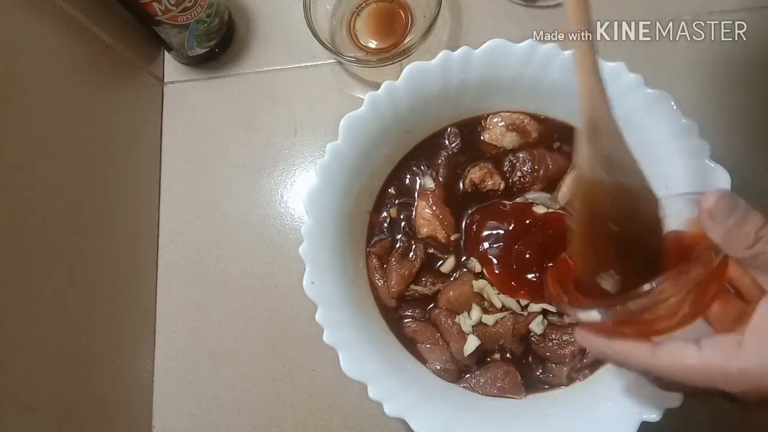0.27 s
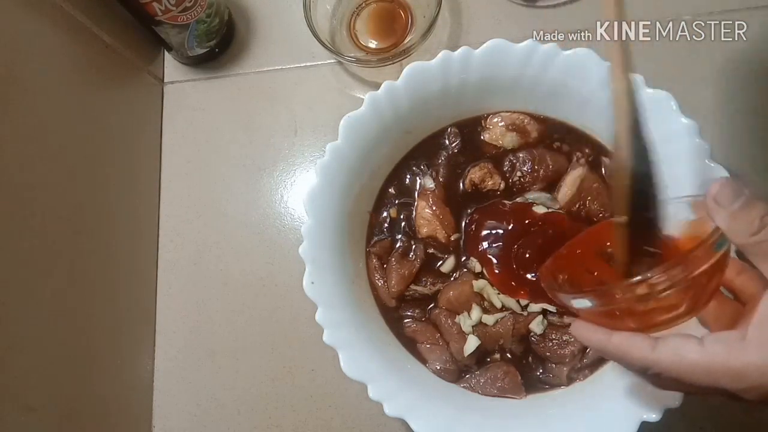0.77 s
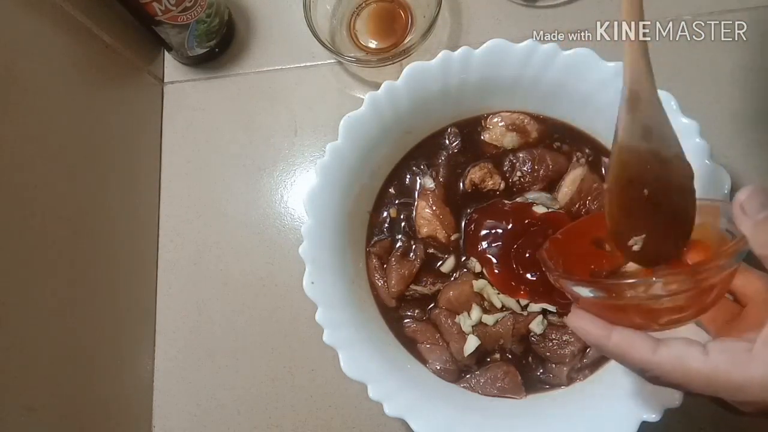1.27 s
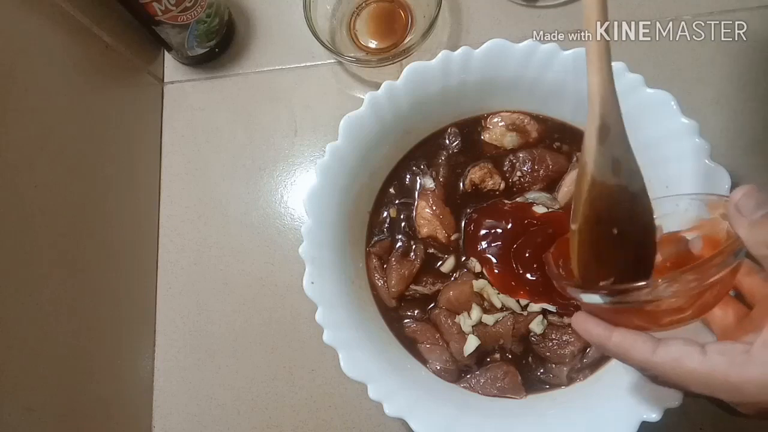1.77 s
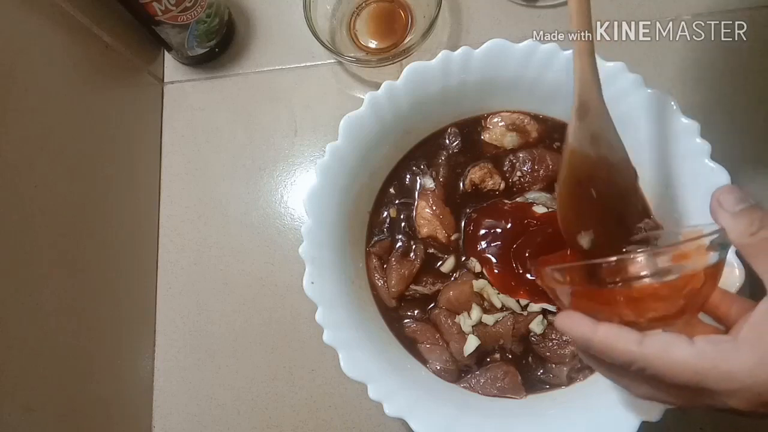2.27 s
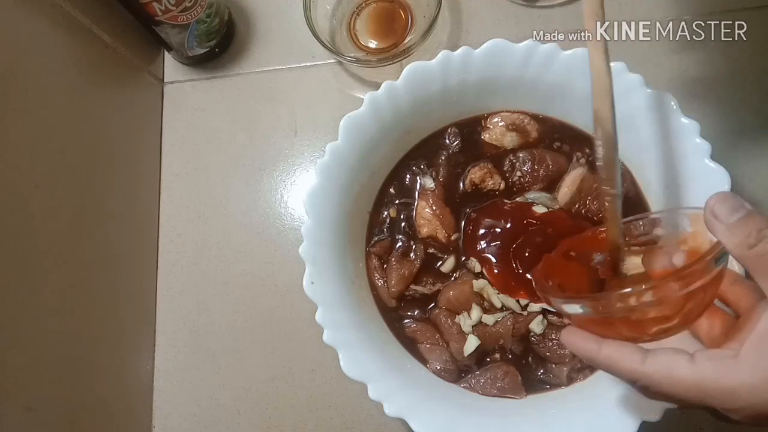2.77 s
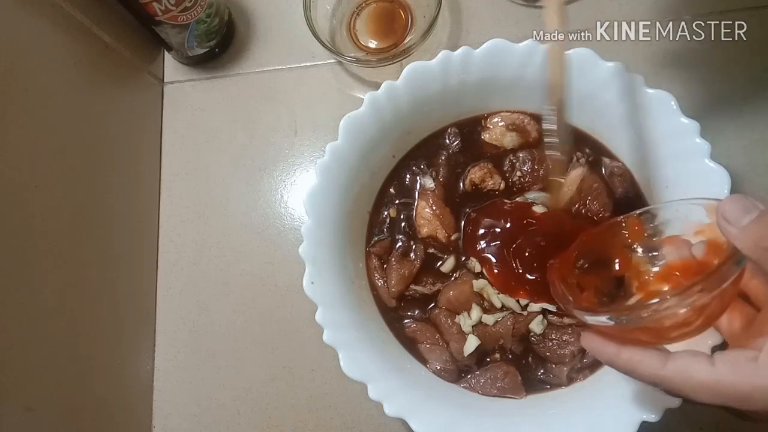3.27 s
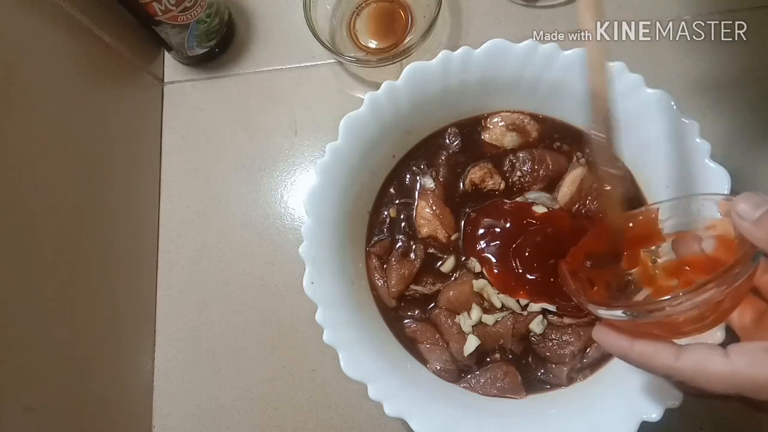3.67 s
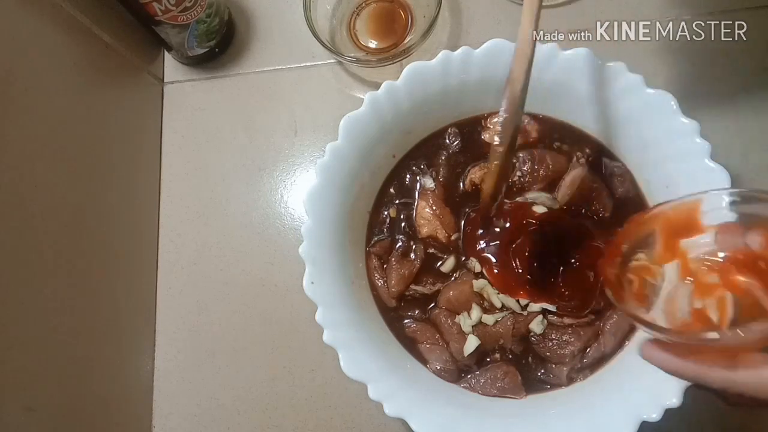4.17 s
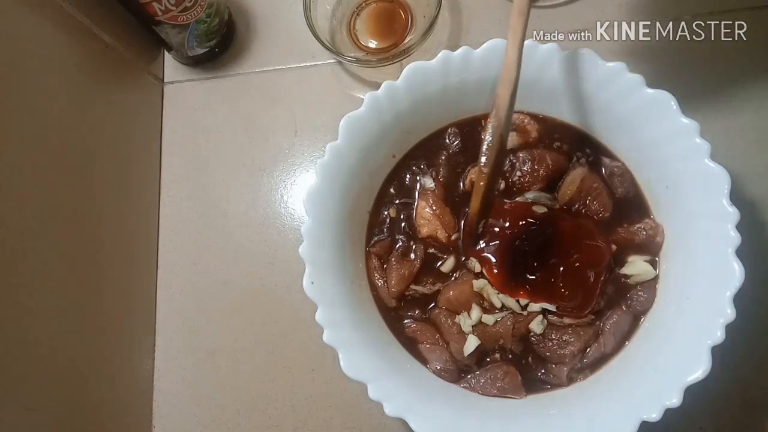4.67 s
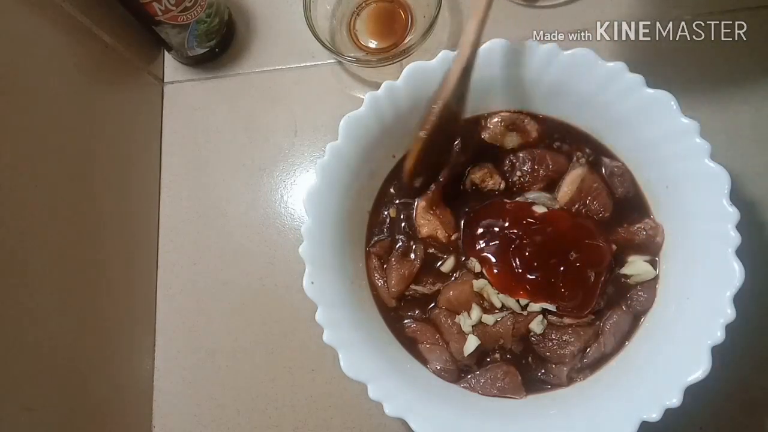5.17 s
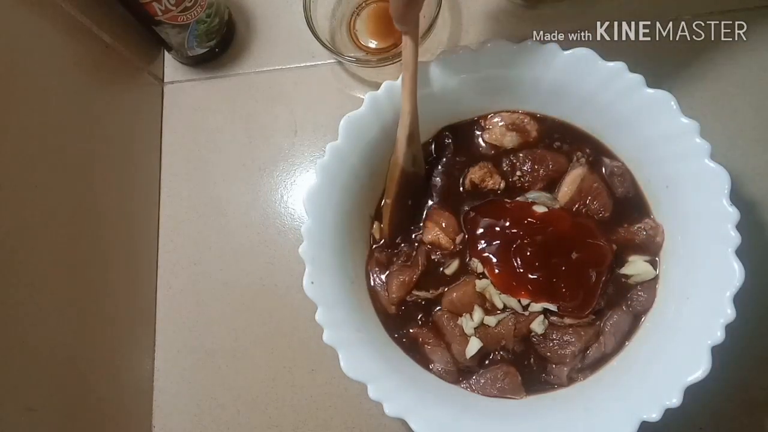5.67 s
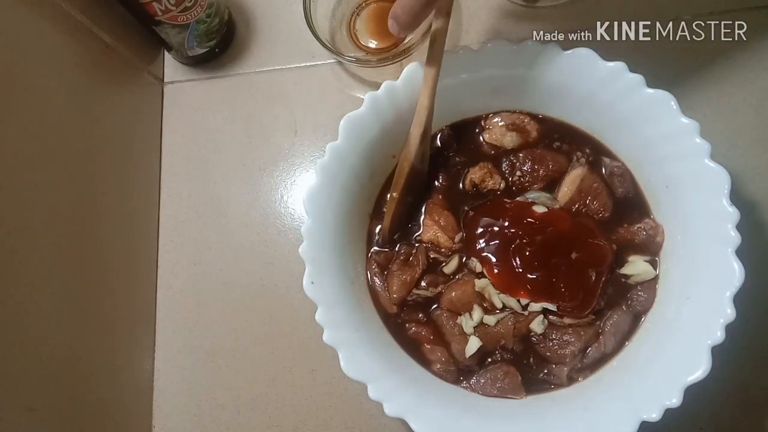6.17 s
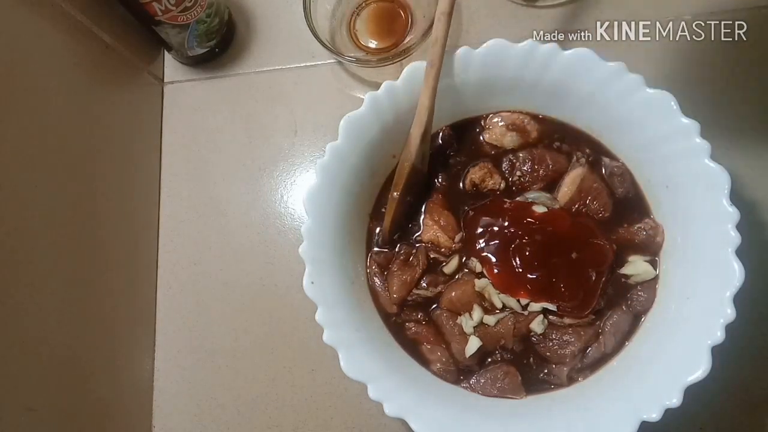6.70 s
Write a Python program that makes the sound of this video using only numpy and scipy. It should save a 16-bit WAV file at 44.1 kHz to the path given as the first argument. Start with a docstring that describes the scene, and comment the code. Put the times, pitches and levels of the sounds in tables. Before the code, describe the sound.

In a hard-walled kitchen, a wooden spoon taps a small sauce-coated glass bowl in uneven, dry knocks with short damped pings. After a pause the bowl is set down, bouncing quickly to rest with chopped bright rings. Stacked glass clinks sharply, then something drags softly. A low motor hum and steady hiss continue throughout. One close microphone, almost mono, short reflections.

```python
"""A wooden spoon taps a small hand-held glass bowl in a hard-walled kitchen: woody knocks and a damped ping.
The bowl is then set down and bounces to rest, its rings stopped and restarted by the landings.
Stacked glass bowls clink in short rattles, with one dull counter knock, and something is dragged briefly.
A motor hums (a tone and a lower drone of filtered noise) under steady, coloured air noise and hiss.
One microphone, almost mono: the blows are near, their reflections short, and only some air differs by side."""
import sys
import numpy as np
from scipy import signal
from scipy.fft import rfft, irfft
from scipy.io import wavfile
from scipy.ndimage import uniform_filter1d

SR = 44100
rng = np.random.default_rng(int(sys.argv[2]) if len(sys.argv) > 2 else 0)


def boost_factor(decibels):
    """Convert a level in decibels to a linear amplitude factor."""
    exponent = np.asarray(decibels, float) / 20
    return 10 ** exponent


def pcm_store(signal):
    """Save signal as 16-bit PCM."""
    levels = np.round(np.clip(np.atleast_2d(signal), -1, 1) * 32767)
    wavfile.write(sys.argv[1], SR, levels.astype(np.int16).T)


N = 305809


def rms_one(x):
    """Scale to an rms of one."""
    return x / np.sqrt(np.mean(x ** 2) + 1e-20)


def in_time(rows):
    """Draw straight lines between rows of (time in s, values)."""
    s, *columns = np.transpose(rows)
    return [np.interp(np.arange(N) / SR, s, column) for column in columns]


def at_hz(points, hz):
    """Read a curve of (Hz, dB), straight over log frequency."""
    point_hz, point_db = np.array(points)[:, 0], np.array(points)[:, 1]
    return np.interp(np.log(hz), np.log(point_hz), point_db)


def shaped(x, gain):
    """Multiply the spectrum by gain(Hz)."""
    hz = np.maximum(np.arange(N // 2 + 1) * SR / N, 1)
    return irfft(rfft(x) * gain(hz), N)


def band(x, low_hz, high_hz):
    """Pass one band of frequencies."""
    return signal.sosfilt(signal.butter(2, [low_hz, high_hz], "band", fs=SR, output="sos"), x)


def air():
    """Room noise with a few broad resonances, plus a separately coloured hiss that reaches higher."""
    # room noise colour: hz, relative_level_db
    room_colour = [(26, -32), (45, -4.5), (118, -4), (297, -25), (361, -16), (739, -18.5), (1090, -14.5),
                   (2200, -27), (2860, -61), (4840, -120)]
    # broad resonances of the room noise: hz, width_hz, boost_db
    resonances = [(147.7, 29, 8.5), (253, 30, 9), (364, 24, 10), (590, 39, 9.5), (817, 8.3, 10),
                  (1093, 39, 7), (1580, 40, 8.5)]
    # hiss colour: hz, relative_level_db
    hiss_colour = [(880, -30), (1500, -7), (1690, -5), (1820, -7), (2390, -6), (3240, -7), (3500, -5),
                   (5320, -5.5), (7560, 0), (10600, -13.5), (15400, -19)]
    room_db, hiss_db = -53, -50.5   # rms in 174-1170 Hz, rms in 5700-14000 Hz

    def colour(hz):
        boost_db = sum(db / (1 + (2 * (hz - f) / w) ** 2) for f, w, db in resonances)
        return boost_factor(at_hz(room_colour, hz) + boost_db)

    low = shaped(rng.standard_normal(N), colour)
    high = shaped(rng.standard_normal(N), lambda hz: boost_factor(at_hz(hiss_colour, hz)))
    low = boost_factor(room_db) * low / np.std(band(low, 174, 1170))
    high = boost_factor(hiss_db) * high / np.std(band(high, 5700, 14000))
    return low + high


def hum():
    """A mains tone, part steady and part blurred, with a wavering level, over a drone of narrow noise."""
    # mains tone before its waver: time_s, level_db
    tone_levels = [(0, -45), (1.2, -47), (2.3, -46), (3.2, -49), (3.7, -47), (4.45, -51), (5.9, -53),
                   (6.12, -44), (6.29, -54), (6.4, -41.5), (6.79, -51.5), (6.93, -65)]
    # lower drone: time_s, level_db
    drone_levels = [(0, -57), (1.05, -53.5), (1.23, -39), (1.43, -65), (1.56, -41.5), (1.8, -44.5),
                    (2.28, -56), (3.2, -51), (3.6, -66), (4.2, -72), (4.55, -51), (4.8, -53), (5.92, -58),
                    (6.12, -45.5), (6.37, -47.5), (6.7, -56), (6.93, -56)]
    tone_hz, drone_hz = 120.5, 87.1
    waver_db, waver_hz = 2, 0.83   # rms depth, corner of the slow noise
    (tone_db,), (drone_db,) = in_time(tone_levels), in_time(drone_levels)
    noise = rng.standard_normal((3, N))
    hz = np.arange(N // 2 + 1) * SR / N
    waver = rms_one(irfft(rfft(noise[2]) / (1 + (hz / waver_hz) ** 2), N))
    blur = rms_one(shaped(noise[0], lambda hz: 1 / (1 + ((hz - tone_hz) / 10.0) ** 2)))
    steady = np.sin(2 * np.pi * tone_hz * np.arange(N) / SR)
    tone = rms_one(steady + 0.29 * blur)
    drone = rms_one(shaped(noise[1], lambda hz: 1 / (1 + ((hz - drone_hz) / 6.9) ** 2)))
    return boost_factor(tone_db + waver_db * waver) * tone + boost_factor(drone_db) * drone


def drag():
    """Uneven slips on a surface: a lumpy rumble with grit on top that grows along the stroke."""
    # strokes: start_s, length_s, rumble_db, grit_db at the start
    strokes = [(5.967, .42, -44.5, -53), (6.43, 0.02, -64, -58)]
    rise_s, stop_s, grit_growth_db_per_s = 0.031, 0.03, 12
    t, out = np.arange(N) / SR, 0
    slips = (rng.random(N) < 1100 / SR) * rng.standard_normal(N) + 1e-9   # about 1100 slips a second
    rumble = rms_one(band(slips, 66, 213))
    grit = rms_one(band(slips[::-1], 290, 1040))
    for s, length, rumble_db, grit_db in strokes:
        stroke = np.clip(np.minimum((t - s) / rise_s, 1 - (t - s - length) / stop_s), 0, 1)
        grown_db = grit_db + grit_growth_db_per_s * np.clip(t - s, 0, length)
        out = out + stroke * (boost_factor(rumble_db) * rumble + boost_factor(grown_db) * grit)
    return out


def strikes(times, colours_db, colour_hz, modes, spread_db, detune=0.013, rise_s=0.0012,
            chatter_s=0.01, clack_db=-6, scatter=2.93, stops=None):
    """Each blow is a short chatter of contacts that rings every mode, weighted by its colour and by chance."""
    stop_t60_s = 0.0028   # how fast a ring dies once stopped
    hz, level_db, t60 = np.transpose(modes)[:, :, None]
    t, out = np.arange(SR // 5) / SR, np.zeros(N + SR)
    luck = rng.normal(0, 1, (len(times), 3, len(modes), 1))
    noise = rng.standard_normal((len(times), 2, len(t)))
    swell = (1 - np.exp(-t / rise_s)) ** 2   # a contact of finite length: no needle click
    fine_hz = np.arange(len(t) // 2 + 1) * SR / len(t)
    for k, s in enumerate(times):
        colour_db = np.interp(np.log(hz), np.log(colour_hz), colours_db[k])
        gain = boost_factor(level_db + colour_db + spread_db * luck[k, 0])
        pitch = hz * (1 + detune * luck[k, 1])   # grip and contact point shift the modes a little
        wave = np.sin(2 * np.pi * pitch * t + scatter * luck[k, 2])
        ring = (gain * boost_factor(-60 * t / t60) * wave).sum(axis=0) * swell
        chatter = noise[k, 0] ** 3 * boost_factor(-60 * t / chatter_s)
        chatter = chatter / np.sqrt(np.sum(chatter ** 2))
        ring += boost_factor(-9.5) * signal.fftconvolve(ring, chatter)[:len(t)]
        # the many small modes between the strong ones blur into a noisy clack
        blur = (gain / (1 + ((fine_hz - hz) / (0.087 * hz)) ** 4)).sum(axis=0)
        clack = irfft(rfft(noise[k, 1]) * blur, len(t)) / np.sqrt(np.mean(blur ** 2))
        clack = clack * np.sqrt(np.sum(gain ** 2))
        ring += boost_factor(clack_db) * clack * swell * boost_factor(-60 * t / np.median(t60))
        if stops is not None:
            ring *= boost_factor(-60 * np.maximum(s + t - stops[k], 0) / stop_t60_s)
        i = round(s * SR)
        out[i:i + len(t)] += ring
    return out[:N]


def stack(count=5):
    """Each clink is a fading rattle of glass-on-glass contacts of chance colour; one dull counter knock."""
    # clinks: start_s, rattle_length_s, then low_db, mid_db, high_db near 1730, 3600 and 7400 Hz
    rattles = [(5.589, .006, -31, -33, -26), (5.5955, .018, -30, -27, -22.5), (5.663, .005, -23, -37, -58),
               (5.6666, .02, -30, -28, -18), (5.6954, .014, -36, -45, -42),
               (5.7485, .003, -40, -45.5, -41.5), (5.8753, .01, -42.5, -60, -56)]
    # where the colour of a contact is set: hz
    rattle_hz = [1730, 2800, 4500, 7400, 11000]
    # modes of the stacked bowls: hz, relative_level_db, t60_s
    stack_modes = [(1400, -11.5, 0.066), (1737, -6.5, 0.073), (2080, -8.5, .04), (2440, -13, 0.065),
                   (2736, 1.5, 0.03), (3250, -3, 0.019), (3630, -10, 0.033), (4210, -8, 0.046),
                   (4520, -12, 0.023), (4550, -2.5, 0.03), (5120, -7.5, 0.029), (6050, -16, 0.046),
                   (6260, -32, 0.051), (7070, -12, 0.034), (7350, -1, 0.049), (7470, -5, 0.03),
                   (7810, -5, 0.054), (7860, -18, 0.049), (9040, -13, 0.06), (10800, 2.5, 0.052),
                   (11600, -6, .06), (14570, -17, 0.061), (15090, -11, 0.051)]
    # dull knocks on the counter: start_s, level_db
    knock_rows = [(5.62, -37.5)]
    # modes of the counter: hz, relative_level_db, t60_s
    counter_modes = [(356, 0.5, 0.093), (474, -7, 0.054), (650, 1, 0.05)]
    fade_db, chance_colour_db = 15.5, 4   # loss over a rattle, spread of a contact's colour
    top_db = -17.5   # 11 kHz relative to 7400 Hz
    s, length, low_db, mid_db, high_db = np.repeat(rattles, count, axis=0).T
    step = np.tile(np.arange(count), len(rattles))
    luck = rng.normal(0, 1, (len(s), 6))
    # place along the rattle, 0 to about 1; the first contact is on time
    along = (step + 0.2 * np.tanh(luck[:, 5]) * (step > 0)) / (count - 1)
    colours_db = np.transpose([low_db, mid_db, mid_db, high_db, high_db + top_db])
    colours_db = colours_db + chance_colour_db * luck[:, :5] - fade_db * along[:, None]
    clinks = strikes(s + along * length, colours_db, rattle_hz, stack_modes, spread_db=2.5,
                     detune=0.0022, rise_s=0.00037, chatter_s=0.0068, clack_db=-2.5)
    knocks = np.array(knock_rows)
    dull = strikes(knocks[:, 0], knocks[:, 1:], [1000], counter_modes, spread_db=5,
                   detune=0, rise_s=0.0028, clack_db=-17)
    return clinks + dull


def bowl_set_down(survives=3):
    """In the air the glass rings clean; landings thud, restart two rings and feed modes that outlast more."""
    # modes of the free bowl: hz, relative_level_db, t60_s
    free_modes = [(1937, -0.5, 1.5), (4146, 5.5, 0.38), (7090, 5, 0.071), (7340, -24, 0.17),
                  (10680, 0, 0.12), (11500, -13, .4), (14560, -17, .15), (15200, -15, 0.091)]
    # what a bounce thuds on: hz, relative_level_db, t60_s
    base_modes = [(1540, -9, 0.066), (1770, -3, 0.02), (2640, -10.5, 0.013), (3060, -12, 0.027),
                  (3200, -3.5, 0.013), (4500, -7, 0.03), (5400, -20, .04), (5700, -16, 0.034),
                  (6600, -31, .03), (7560, -6, .03), (7600, -20, .03)]
    # a landing can feed or choke a ring, one row each: lowest_mode_db, ring_7_khz_db
    rebounds = [(-28, -10), (-41, -9.5), (-28, -20), (-35, -31), (-37, -32), (-37, -24), (-40, -32),
                (-33, -24), (-39, -18), (-29, -13), (-33, -16), (-45, -28), (-44, -23)]
    set_down_s = 5.2062
    first_flight_s, flight_shrink = 0.032, 0.79   # n-th flight: first_flight_s / n ** flight_shrink
    thud_first_db, thud_loss_db, settle_db = -24, 0.9, -6   # loss per landing; the last two thuds drop more
    struck_db, restruck_db, restruck_loss_db = -29, -38, 1   # first landing; later ones, loss per landing
    thud_s = 0.0041   # the base holds still this soon after a landing
    n = np.arange(len(rebounds))
    flights = first_flight_s / (n + 1) ** flight_shrink
    touches = set_down_s + np.append(0, np.cumsum(flights))
    s, following, rows = touches[:-1], touches[1:], np.array(rebounds)
    thud_db = thud_first_db - thud_loss_db * n + settle_db * (n >= len(n) - 2)
    lasting_db = np.where(n == 0, struck_db, restruck_db - restruck_loss_db * n)
    low = strikes(s, rows[:, :1], [1000], free_modes[:1], spread_db=4.5, detune=0.0003,
                  rise_s=0.0015, chatter_s=0.0025, clack_db=-18, stops=following)
    # the 7 kHz ring swells slowly after a landing
    bright = strikes(s, rows[:, 1:], [1000], free_modes[2:4], spread_db=2.6, detune=0.0003,
                     rise_s=0.003, chatter_s=0.0018, clack_db=-18, stops=following)
    # these modes are stopped only by a later landing
    last_touch = touches[np.minimum(n + survives, len(s))]
    lasting = strikes(s, lasting_db[:, None], [1000], free_modes[1:2] + free_modes[4:], spread_db=4.5,
                      detune=0.00056, rise_s=0.00076, chatter_s=0.0042, clack_db=-16, stops=last_touch)
    thuds = strikes(s, thud_db[:, None], [1000], base_modes, spread_db=2.0, detune=0.026,
                    rise_s=0.00017, chatter_s=0.0023, clack_db=2.5, stops=s + thud_s)
    return low + bright + lasting + thuds


def spoon():
    """Short woody knocks, and a damped ping from the glass."""
    # taps on the held bowl: start_s, wood low_db, body_db, tick_db near 500, 1500, 3100 Hz,
    # then glass_low_db up to 4300 Hz and glass_high_db from 7200 Hz
    taps = [(0.003, -27, -37, -45.5, -47, -61), (0.378, -24.5, -19.5, -21.5, -30.5, -36),
            (0.472, -29.5, -25, -11.5, -30.5, -42), (0.749, -20, -26, -16.5, -33, -30.5),
            (0.867, -38, -34.5, -48.5, -37.5, -59), (1.142, -37, -60, -63, -65, -56),
            (1.306, -25.5, -20, -15.5, -37.5, -54), (1.483, -26.5, -36.5, -19.5, -42, -39),
            (1.584, -46, -27.5, -31, -27, -40), (2.179, -30, -36.5, -26, -29.5, -55),
            (2.53, -33.5, -30, -27, -36, -49), (2.85, -31.5, -31, -37, -23.5, -31),
            (3.138, -53, -52, -64, -50, -55), (3.447, -36, -36, -42.5, -39.5, -29.5),
            (3.558, -38, -65, -61, -54, -57), (3.868, -42, -52, -62, -44.5, -55)]
    # modes of the wooden spoon: hz, relative_level_db, t60_s
    wood_modes = [(460, -14.5, 0.1), (580, -11.5, 0.043), (693, -4.5, 0.029), (1045, -11, 0.04),
                  (1294, -8, 0.025), (1410, 0, 0.015), (1534, -1, 0.036), (2180, -9.5, 0.048),
                  (2555, -29.5, 0.007), (2700, 0, 0.014), (2990, -2.5, 0.016), (3210, -2.5, 0.019),
                  (3700, -13, 0.02), (4180, -12, 0.022), (4303, -8, 0.023), (4320, 2.5, 0.017),
                  (5204, -4.5, 0.026), (5980, -14, 0.053), (6300, -15, 0.031), (8080, -10.5, 0.016)]
    # modes of the bowl damped by hand and sauce: hz, relative_level_db, t60_s
    glass_modes = [(1853, 9.5, 0.052), (4250, -5.5, 0.076), (7250, -4, 0.044), (7710, 1, 0.061),
                   (11400, -10, 0.034)]
    s, low_db, body_db, tick_db, *glass_db = np.transpose(taps)
    # wood at 4500 Hz is 10 dB below 3100 Hz
    wood_db = np.transpose([low_db, body_db, tick_db, tick_db - 10])
    wood = strikes(s, wood_db, [500, 1500, 3100, 4500], wood_modes, spread_db=0.4, detune=0.018,
                   rise_s=0.00019, chatter_s=0.0084, clack_db=0.2, scatter=0.67)
    ping = strikes(s, np.transpose(glass_db), [4300, 7200], glass_modes, spread_db=1.5, detune=0.0021,
                   rise_s=0.0008, chatter_s=0.0021, clack_db=-24.0)
    return wood + ping


def kitchen(x):
    """Dense reflections off hard walls: noise that rises within a millisecond or so and dies fast."""
    t60_s = 0.14
    t = np.arange(SR // 2) / SR
    tail = rng.standard_normal(len(t)) * boost_factor(-60 * t / t60_s) * (1 - np.exp(-t / 0.00033))
    tail = band(tail, 160, 8000)
    return signal.fftconvolve(x, tail / np.sqrt(np.sum(tail ** 2)))[:N]


def gain_control(x):
    """Loud blows pull the gain down a little; it creeps back."""
    duck_db, threshold_db, recover_s = 0.5, -17.5, 0.35   # greatest depth, peak level, release constant
    loud = (np.abs(x).max(axis=0) > boost_factor(threshold_db)) * 1.0
    decay = np.exp(-1 / (recover_s * SR))
    held = np.minimum(signal.lfilter([1 / 40], [1, -decay], loud), 1)   # 40 loud samples reach full depth
    return x * boost_factor(-duck_db * uniform_filter1d(held, size=400))


def scene():
    """Near blows and their reflections over drag, hum and air; nearly the same in both channels."""
    # how far the air differs between the channels: hz, side_gain_db
    side_gain = [(60, -27), (110, -58), (200, -20), (380, -21), (700, -20), (1290, -25), (2380, -18),
                 (4400, -22.5), (8120, -40.5), (15000, -15)]
    near = spoon() + bowl_set_down() + stack()
    reflections = boost_factor(-10) * kitchen(near)
    mid = near + reflections + drag() + hum() + air()
    # a second draw of the air, turned by a quarter cycle
    side = shaped(air(), lambda hz: boost_factor(at_hz(side_gain, hz)) * 1j)
    return np.array([mid + side, mid - side])


def roll_off(x):
    """The treble ends steeply here."""
    return signal.sosfilt(signal.butter(12, 16620, fs=SR, output="sos"), x)


def record(dry):
    """Gain control acts, the microphone drops the deepest bass, and the top is cut steeply."""
    rumble_cut_hz, top_cut_hz = 46, 15700
    levelled = gain_control(dry)
    bass_cut = signal.butter(3, rumble_cut_hz, "high", fs=SR, output="sos")
    top_cut = signal.ellip(10, 0.5, 30, top_cut_hz, fs=SR, output="sos")
    mix = signal.sosfilt(top_cut, signal.sosfilt(bass_cut, levelled))
    return roll_off(mix)


dry = scene()
out = record(dry)
pcm_store(out)
```